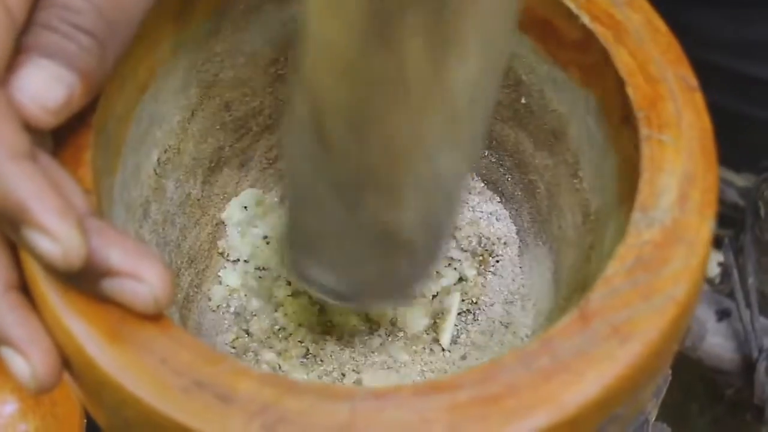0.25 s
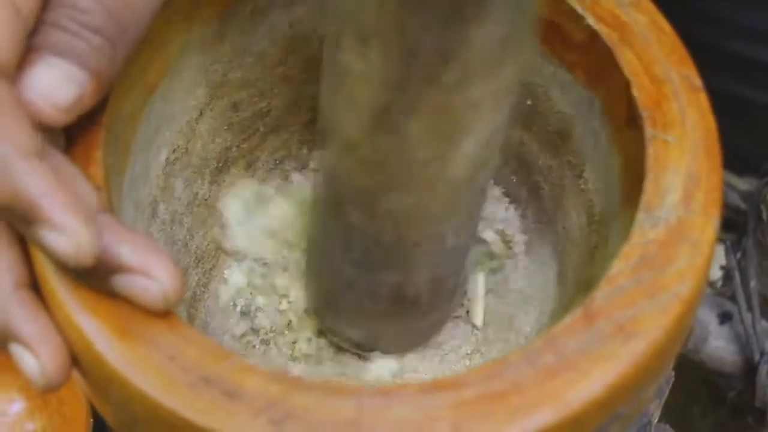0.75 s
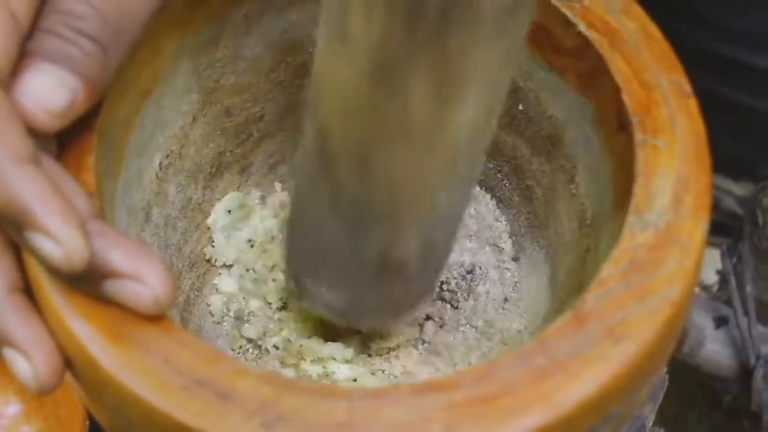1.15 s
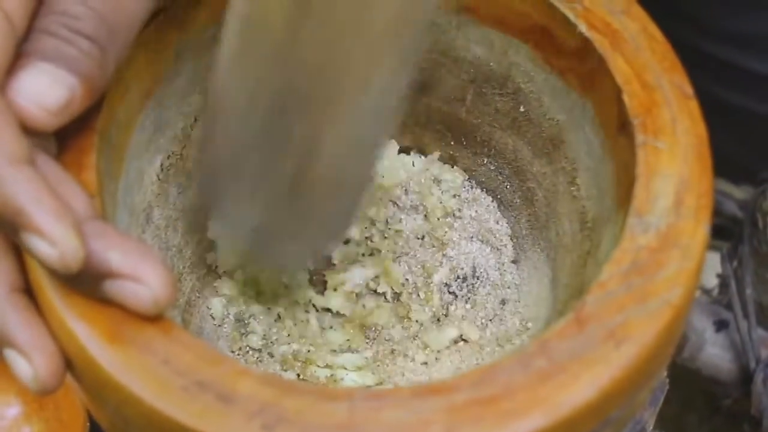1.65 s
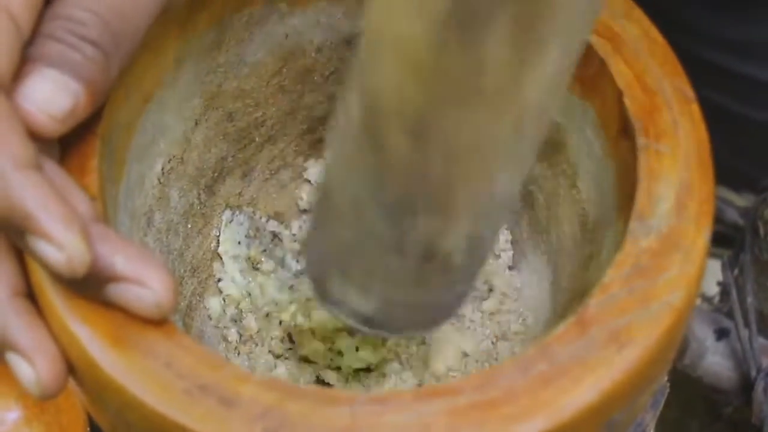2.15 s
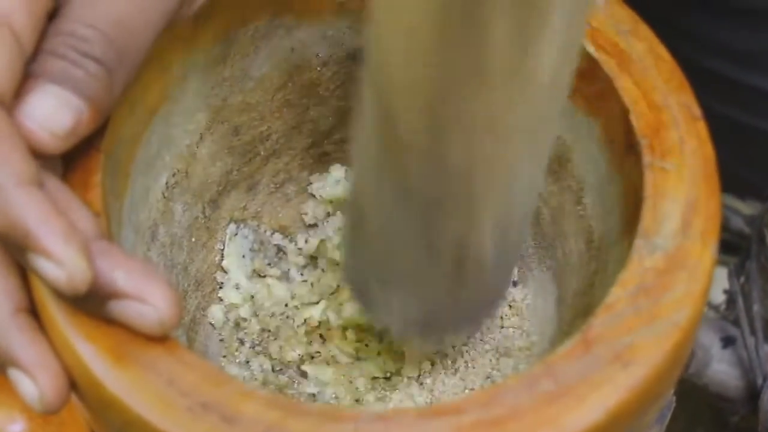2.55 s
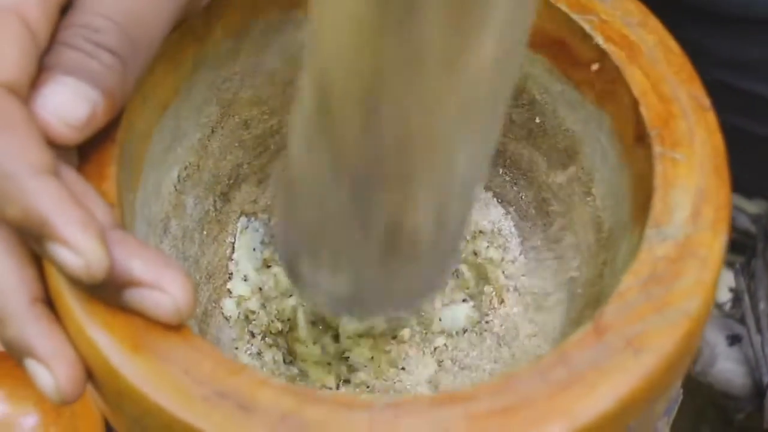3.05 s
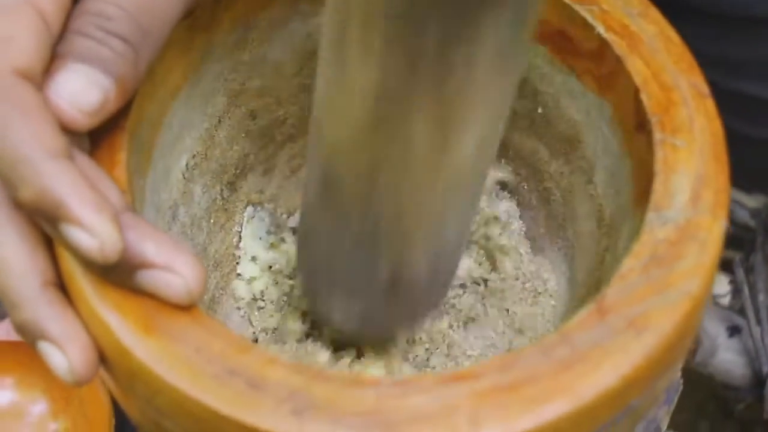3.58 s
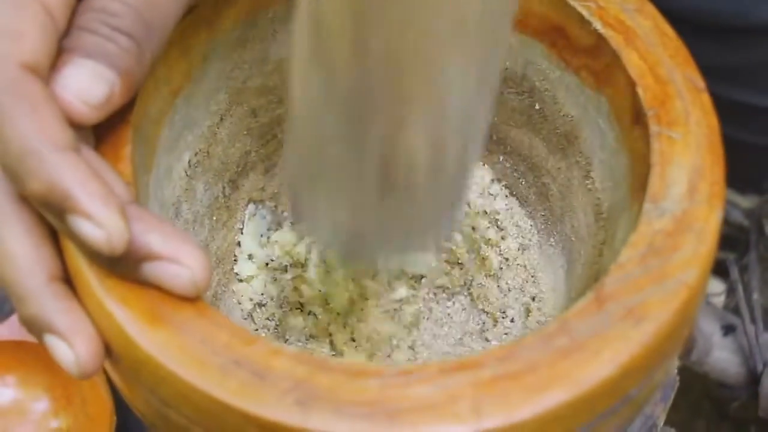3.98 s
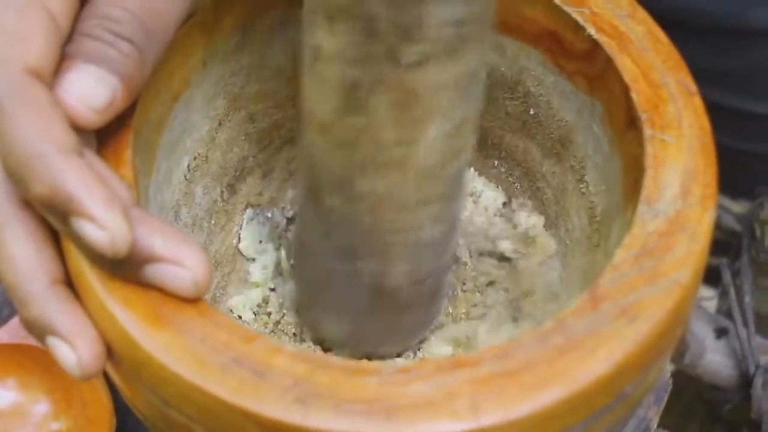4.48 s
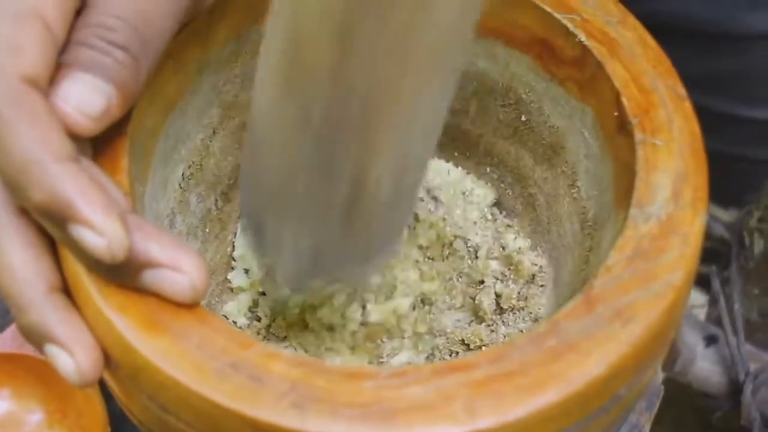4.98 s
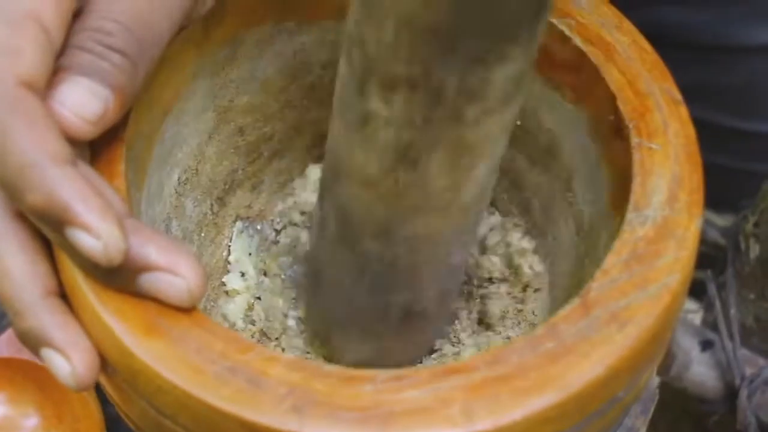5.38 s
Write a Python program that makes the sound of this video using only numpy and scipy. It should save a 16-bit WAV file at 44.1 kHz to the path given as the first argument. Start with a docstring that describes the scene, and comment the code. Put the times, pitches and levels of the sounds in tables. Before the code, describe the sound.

Steady close wooden thumps with wet, grainy crunches and short scraping slides, as a pestle crushes seasoning in a mortar over faint outdoor air.

```python
"""Outdoors, close to the microphone, a wooden pestle pounds garlic and spices in a wooden mortar.
Light knocks on the wall come first, then about three strokes a second: each crunches through the paste as
breaking grains, thumps the bowl as damped modes struck by a force pulse, then slides and knocks along the wall.
Peaks beyond full scale clip. Behind lies filtered-noise air, with a faint throbbing drone at the start,
a high hiss that swells twice just after two seconds, and the drone again around and after the second swell."""
import sys
import numpy as np
from scipy import signal
from scipy.fft import rfft, irfft, next_fast_len
from scipy.io import wavfile
from scipy.ndimage import uniform_filter1d, map_coordinates

SR = 44100
rng = np.random.default_rng(int(sys.argv[2]) if len(sys.argv) > 2 else 0)


def wav_out(sig):
    """Save sig, one row per channel (or a flat mono array), as 16-bit PCM at SR to the path in sys.argv[1]."""
    wavfile.write(sys.argv[1], SR, np.round(np.clip(np.atleast_2d(sig).T, -1, 1) * 32767).astype(np.int16))


N = 248283
T = np.arange(int(SR * 0.4)) / SR  # time within one short sound [s]

# blows of the pestle: (time [s], force [dB], bowl ring before a common lift [dB], clack [dB],
# contact hardness [Hz], crunch length [s], grind length [s])
STROKES = [(0.2839, 3, -0.5, -7, 464, 0.0044, .056), (0.5784, -14, -17, -28, 420, .012, 0.051),
           (0.8778, 0, 4, -13, 470, 0.015, 0.054), (1.193, 0, 5, 8, 438, 0.0071, 0.055),
           (1.5039, 1, 1.5, 1, 462, 0.0075, 0.088), (1.8183, -8, -2, 1.5, 1690, 0.025, 0.073),
           (2.1202, -6.5, -10.5, -28, 464, .019, 0.11), (2.424, -1.5, 5, -20, 446, .011, 0.055),
           (2.725, -2, -2.5, -8, 473, .013, 0.044), (3.031, -3.5, -6, -.5, 436, 0.0067, .11),
           (3.338, -5, 3, -11, 446, 0.024, .115), (3.6327, -5, -0.5, -5, 444, .013, 0.07),
           (3.931, -7.5, 7, -11, 440, 0.022, 0.15), (4.246, -4.5, -8, -5.5, 447, 0.013, 0.097),
           (4.5574, -1, 7, 8.5, 715, 0.015, 0.11), (4.861, -8, -18, -5, 430, 0.012, 0.07),
           (5.175, -0.5, 5, 13, 770, 0.0037, 0.059), (5.4863, -2, 4, 0.5, 421, 0.0079, 0.072)]
# modes of the wooden bowl and its hollow: (frequency [Hz], level [dB], t60 before extra damping [s])
BOWL_MODES = [(213.5, -9, 0.25), (369.9, -3, 0.16), (424.7, -3.5, 0.12), (862, -14, 0.056),
              (1114, -7, 0.081), (1566, -9, 0.067), (2038, -14.5, 0.14), (2480, -8.5, 0.073)]
# modes of the hand-held pestle: (frequency [Hz], level [dB], t60 before extra damping [s])
PESTLE_MODES = [(545, -4, 0.03), (629, -8, 0.039), (760.5, -5, 0.045), (893, -5, 0.031), (1035, -3, 0.033),
                (1312, -2, 0.018), (1480, -20, 0.024), (1598, 1, 0.022), (2208, 2.5, 0.036)]
# spectrum of breaking seeds and garlic: (frequency [Hz], relative level [dB per Hz])
CRUNCH_SPECTRUM = [(100, -17.5), (400, -3), (900, 2), (1350, -8.5), (1800, -2.5), (2550, 0.5), (3100, -1),
                   (5300, -4), (7500, -11.5), (10000, -19), (12000, -25), (15500, -27)]
THUMP_HZ = 173.2  # mean pitch of the mortar's bounce on its support


def blows():
    """The pestle bottoms out and clacks; while it presses, it damps the bowl."""
    thump_db, ring_lift_db = 5, 3.5  # thump at force 0 dB; lift of every bowl ring
    out = np.zeros(N)
    for s, force_db, ring_db, clack_db, hardness_hz, _, _ in STROKES:
        bounce = amp(thump_db + force_db) * thump(THUMP_HZ, t60=0.048)
        bowl = amp(ring_db + ring_lift_db) * ring(BOWL_MODES, damping=4.08, scatter_db=4.5, detune=0.1)
        clack = amp(clack_db) * ring(PESTLE_MODES, damping=0.85, scatter_db=4.5, detune=0.048)
        cushion = 0.865 / hardness_hz  # softer paste takes longer to squeeze flat [s]
        add(out, s + cushion, -through(bounce + bowl + clack, contact(hardness_hz)))
    return radiate(out, corner_hz=57)


def crunches():
    """Seeds and garlic break ever faster as the pestle sinks in, until it comes to rest."""
    base_db, db_per_force_db = -11, 0.25  # level at force 0 dB; gain per dB of force
    usual_s, thinning_db = 0.012, 3  # a usual crunch length; loss each time it doubles
    lead = 0.02  # room for the rise ahead of the blow [s]
    out = np.zeros(N)
    for s, force_db, _, _, hardness_hz, length, _ in STROKES:
        t = T - lead
        crunch_db = base_db + db_per_force_db * force_db - thinning_db * np.log2(length / usual_s)
        rise = np.exp(np.minimum(t - 0.0004, 0) * hardness_hz * 1.67)
        sag = amp(-5.5 * np.clip(t / length, 0, 1))
        release = np.exp(-np.maximum(t - length, 0) / 0.0043)
        burst = amp(crunch_db) * rise * sag * release * grains(clumping=1.5, rate=1300)
        # the gap between pestle and wall tints each burst differently
        tint = colour([(hz, db + 3.73 * rng.standard_normal()) for hz, db in CRUNCH_SPECTRUM])
        add(out, s - lead, through(burst, tint))
    return out


def grinding():
    """After each blow the pestle slides over grit, single seeds snap, and the bowl sings along."""
    # spectrum of the rubbing grit: (frequency [Hz], relative level [dB per Hz])
    scrape_spectrum = [(30, -23.5), (70, -3), (140, 9.5), (450, 3), (650, -9), (1200, -6.5), (2200, -13.5),
                       (3500, -18.5), (5000, -23), (8000, -36), (11000, -51), (16000, -51)]
    base_db, db_per_force_db = -21.5, 0.31  # level at force 0 dB; gain per dB of force
    out = np.zeros(N)
    for s, force_db, *_, length in STROKES:
        onset = 1 - np.exp(-T / 0.0014)
        sag = amp(-5.5 * np.minimum(T / length, 1))
        pressure = onset * sag * np.exp(-np.maximum(T - length, 0) / 0.031)
        rubbing = pressure + amp(-0.5) * fade(0.27)  # crumbs keep rubbing as the pestle leaves
        wood = through(ring(BOWL_MODES, damping=0.96, scatter_db=2.5, detune=0.026), contact(hardness_hz=990))
        song = through(pressure * grains(clumping=2.5, rate=270), wood / np.linalg.norm(wood))
        rasp = through(rubbing * grains(clumping=5.0, rate=300), colour(scrape_spectrum))
        snaps = through(rubbing * crackles(rate=140, spread_db=29), colour(CRUNCH_SPECTRUM))
        slide = amp(1.0) * song + amp(-3.0) * rasp + amp(-20.0) * snaps
        add(out, s + 0.008, amp(base_db + db_per_force_db * force_db) * slide)
    return out


def knocks():
    """Lighter contacts, as the pestle rebounds, let the bowl ring on and crack a few more seeds."""
    # rebounds against the wall: (time [s], strength [dB], contact hardness [Hz])
    rebounds = [(.001, -7.5, 590), (0.0245, -7.5, 604), (0.3254, -8, 1500), (0.6132, -19.5, 1240),
                (.922, -7.5, 590), (1.84, -7.5, 1060), (2.1752, -13, 850), (2.466, -9, 500),
                (2.7453, -7, 720), (3.0823, -6.5, 1250), (3.092, -2.5, 420), (3.39, -9, 555),
                (3.7048, -15, 800), (3.9885, -11, 724), (4.01, -4, 433), (4.062, -15, 910),
                (4.2728, -5, 624), (4.334, -10, 397), (4.615, -7, 420), (4.902, -12, 625),
                (5.215, -13, 1310), (5.229, -11.5, 480), (5.501, -5.5, 700)]
    thump_db = 0.5
    # grit level of a hard knock; below this hardness it falls away
    hard_grit_db, full_grit_hz, fall_db_per_octave = -5.5, 950, 13
    out = np.zeros(N)
    for s, strength_db, hardness_hz in taps(count=1) + rebounds:
        bounce = amp(thump_db) * thump(THUMP_HZ, t60=0.033)
        bowl = ring(BOWL_MODES, damping=1.165, scatter_db=2.5, detune=0.034)
        clack = amp(1.5) * ring(PESTLE_MODES, damping=1.66, scatter_db=3.5, detune=0.064)
        body = through(bounce + bowl + clack, contact(hardness_hz))
        grit = grains(clumping=3, rate=1000) * fade(0.018) * (1 - np.exp(-T / 0.0011))
        grit = through(grit, colour(CRUNCH_SPECTRUM))
        grit_db = hard_grit_db - fall_db_per_octave * max(np.log2(full_grit_hz / hardness_hz), 0)
        add(out, s, amp(strength_db) * (body + amp(grit_db) * grit))
    return radiate(out, corner_hz=72)


def taps(count):
    """Light brushes with the wall at chance moments after each blow: (time [s], strength [dB], hardness [Hz])."""
    mean_db, spread_db, hardness_hz = -23.5, 1.5, 850
    wait_s = 0.025  # no brush comes sooner than this after the blow
    rows = []
    for s, *_, length in STROKES:
        for _ in range(count):
            moment = s + wait_s + length * rng.random()
            rows.append((moment, mean_db + spread_db * rng.standard_normal(), hardness_hz))
    return rows


def high_hiss():
    """A narrow, patchy band of high noise that swells twice."""
    # spectrum: (frequency [Hz], relative level [dB per Hz])
    hiss_spectrum = [(3500, -72), (4500, -11), (4850, -6), (6700, -4), (7200, -15), (9000, -31),
                     (12000, -36)]
    # swells: (time [s], hold [s], level [dB])
    hiss_swells = [(2.085, .14, -44), (2.34, 0.074, -41.5)]
    hiss = patchy(through(rng.standard_normal(N), colour(hiss_spectrum)), depth_db=2.0)
    return hiss * swells(hiss_swells, rise_db_per_s=327, fall_db_per_s=130)


def drone(hz, width_hz, throb_rate):
    """Faint narrow-band noise whose level throbs at a wandering rate, like a far engine."""
    # spells: (time [s], hold [s], level [dB])
    drone_spells = [(0, 0.069, -39.5), (2.33, .1, -40), (3.5, 1.3, -40)]
    resonance = np.cos(2 * np.pi * hz * T) * np.exp(-np.pi * width_hz * T) * T
    band = unit(through(rng.standard_normal(N), resonance))
    turns = np.cumsum(throb_rate * (1 + 0.1633 * wobble(3.6, N))) / SR
    throbbing = unit(band * amp(13 * np.sin(2 * np.pi * turns)))
    return swells(drone_spells, rise_db_per_s=32, fall_db_per_s=46) * throbbing


def outdoor_air():
    """Wavering noise of the open air, with steady noise that rings in the hollow of the bowl."""
    # spectrum: (frequency [Hz], relative level [dB per Hz])
    air_spectrum = [(15, -46), (25, -11), (59, -1.5), (256, -7), (531, -9.5), (624, -7.5), (818, -6),
                    (1100, -3), (1370, -6), (1740, -5), (2160, -9), (3080, -10.5), (3920, -16.5),
                    (5880, -19.5), (16000, -42.5)]
    # common level of air and hollow, before their balance: (time [s], level [dB])
    air_level = [(0.0, -40.5), (0.38, -50), (2.27, -41.5), (3.04, -46.5), (3.2, -43.5), (5.63, -47)]
    air_db, hollow_db = 1, -2.5
    air = patchy(through(rng.standard_normal(N), colour(air_spectrum)), depth_db=3.5)
    air = air * amp(0.92 * wobble(14, N))
    wood = through(ring(BOWL_MODES, damping=3.7, scatter_db=-0.5, detune=0.0079), contact(hardness_hz=392))
    hollow = unit(through(rng.standard_normal(N), wood))
    return level(air_level) * (amp(air_db) * air + amp(hollow_db) * hollow)


def thump(hz, t60):
    """The whole mortar bounces on its support, which takes a moment to give; each pitch differs."""
    pitch = hz * (1 + 0.11 * rng.standard_normal())
    return np.sin(2 * np.pi * pitch * T) * fade(t60) * (1 - np.exp(-T / 0.00057))


def ring(modes, damping, scatter_db, detune):
    """Damped modes; each point of contact weights and detunes them anew."""
    chance = rng.standard_normal((len(modes), 2))
    out = np.zeros(len(T))
    for (hz, db, t60), (weight, shift) in zip(modes, chance):
        build_up = 1 - np.exp(-2 * hz * T)  # over half a cycle
        tone = np.cos(2 * np.pi * hz * (1 + detune * shift) * T)
        out += amp(db + scatter_db * weight) * fade(t60 / damping) * tone * build_up
    return out


def contact(hardness_hz):
    """Force pulse of area 1: soft paste stretches it, bare wood keeps it short."""
    force = T * np.exp(-2 * np.pi * hardness_hz * T)
    return force / force.sum()


def radiate(x, corner_hz):
    """A small bowl gives off little deep bass."""
    return signal.sosfilt(signal.butter(2, corner_hz, "high", fs=SR, output="sos"), x)


def grains(clumping, rate):
    """Tiny fractures as noise whose level swings up to 2.97 dB per unit of clumping either way, rms 1."""
    swing_db = clumping * np.tanh(wobble(rate, len(T)) / 2) * 2.97
    return unit(rng.standard_normal(len(T)) * amp(swing_db))


def crackles(rate, spread_db):
    """Single seeds that snap at random moments and sizes, about rate a second, rms 1."""
    snaps = (rng.random(len(T)) < rate / SR) * amp(-spread_db * rng.random(len(T)))
    return unit(through(snaps, fade(0.012)) * rng.standard_normal(len(T)))


def patchy(x, depth_db):
    """Give noise small patches of random gain in time and frequency, rms 1."""
    z = signal.stft(x, nperseg=512)[2]
    across_frequency = uniform_filter1d(rng.standard_normal(z.shape), size=5, axis=0)
    field = uniform_filter1d(across_frequency, size=3, axis=1)
    return unit(signal.istft(z * amp(depth_db * unit(field)), nperseg=512)[1][:N])


def swells(rows, rise_db_per_s, fall_db_per_s):
    """Gain per sample of swells that rise, hold and fall, from (time [s], hold [s], level [dB]) rows."""
    t = np.arange(N) / SR
    curves = []
    for s, hold, db in rows:
        rise = rise_db_per_s * np.maximum(s - t, 0)
        fall = fall_db_per_s * np.maximum(t - s - hold, 0)
        curves.append(db - rise - fall)
    return amp(np.max(curves, axis=0))


def level(rows):
    """Gain per sample from (time [s], level [dB]) rows."""
    return amp(np.interp(np.arange(N) / SR, *np.transpose(rows)))


def colour(points, size=4096):
    """Causal impulse response of energy 1 with the given (Hz, dB) spectrum."""
    hz, db = np.transpose(points)
    bins_hz = np.fft.rfftfreq(size, 1 / SR) + 1  # 1 Hz up, to keep the logarithm finite
    cepstrum = irfft(np.log(amp(np.interp(np.log(bins_hz), np.log(hz), db))))
    cepstrum[1:size // 2] *= 2  # folding the cepstrum gives minimum phase
    cepstrum[size // 2 + 1:] = 0
    response = irfft(np.exp(rfft(cepstrum)))
    return response / np.linalg.norm(response)


def through(x, response):
    """Pass x through an impulse response."""
    return signal.fftconvolve(x, response)[:len(x)]


def wobble(rate, size):
    """A smooth random curve, rate knots a second."""
    knots = rng.standard_normal(int(size * rate / SR) + 4)
    return map_coordinates(knots, [np.arange(size) * rate / SR])


def fade(t60):
    """A decay that loses 60 dB in t60 seconds."""
    return np.exp(-np.log(1000) * T / t60)


def amp(db):
    """Decibels to gain."""
    return 10 ** (np.asarray(db) / 20)


def unit(x):
    """Scale to rms 1."""
    return x / np.sqrt(np.mean(x ** 2) + 1e-20)


def add(track, s, sound):
    """Mix a sound into the track from time s [s] on."""
    start = max(0, round(s * SR))
    track[start:start + len(sound)] += sound[:N - start]


def scene():
    """The mortar close by, in the open air."""
    mortar = blows() + crunches() + grinding() + knocks()
    background = high_hiss() + drone(hz=386, width_hz=126, throb_rate=23) + outdoor_air()
    return (mortar + background)[None]


def record(dry):
    """The recorder clips at full scale and keeps nothing above its band limit."""
    top_hz, slope_hz = 15800, 400  # middle and width of the band edge
    clipped = np.clip(dry, -1, 1)
    size = next_fast_len(N + SR // 2)
    passband = np.clip((top_hz - np.fft.rfftfreq(size, 1 / SR)) / slope_hz + 0.5, 0, 1)
    return irfft(rfft(clipped, size) * passband, size)[:, :N]


dry = scene()
out = record(dry)
wav_out(out)
```